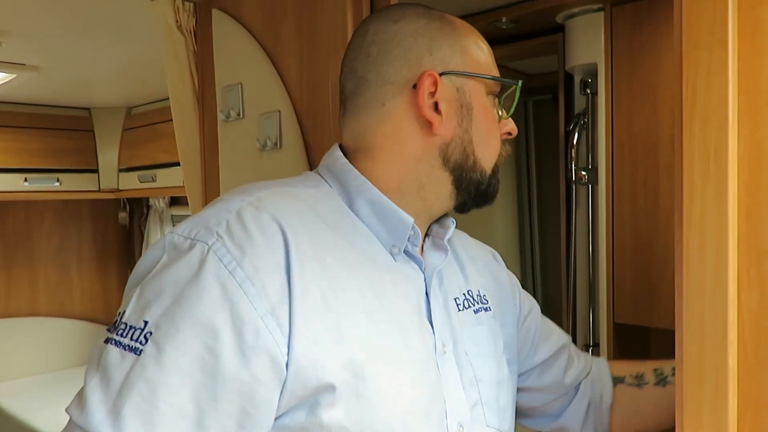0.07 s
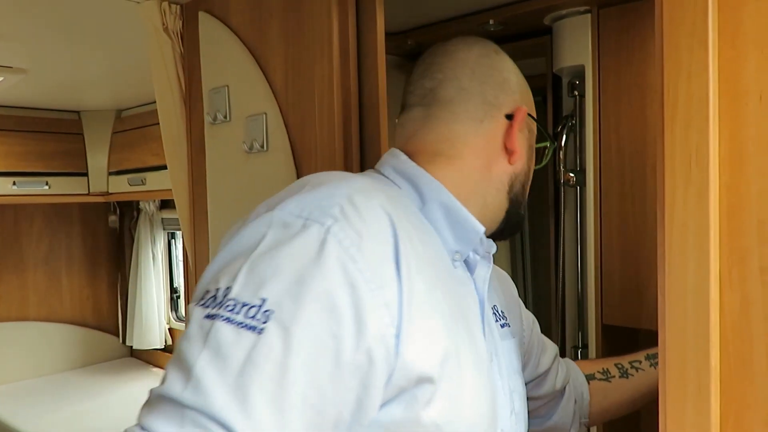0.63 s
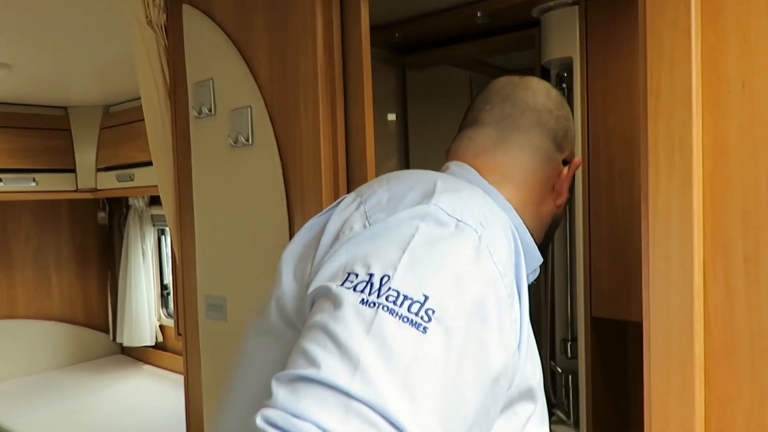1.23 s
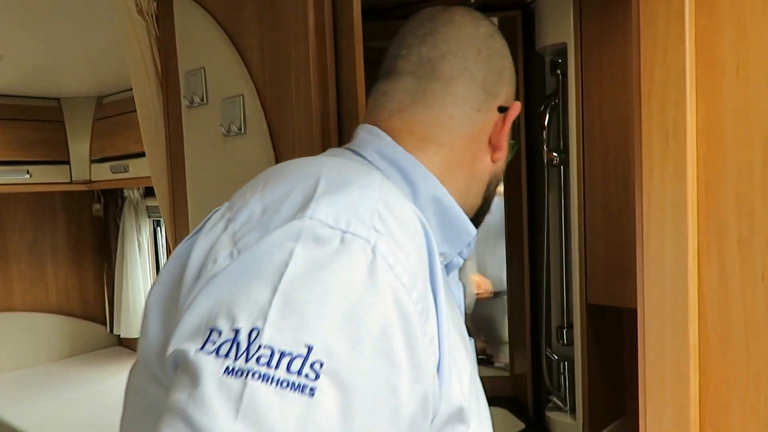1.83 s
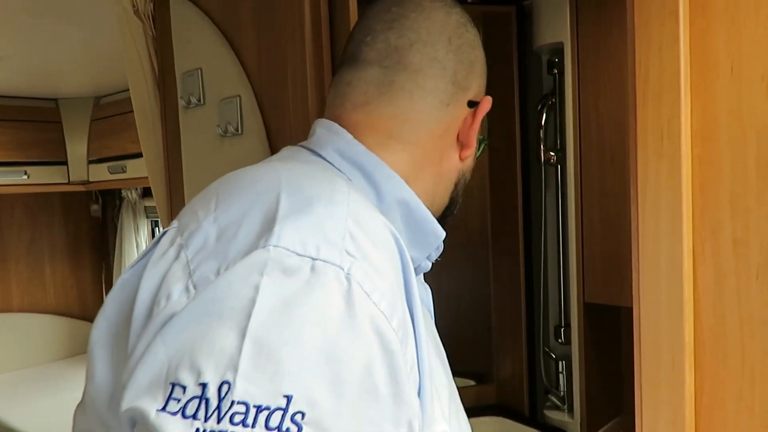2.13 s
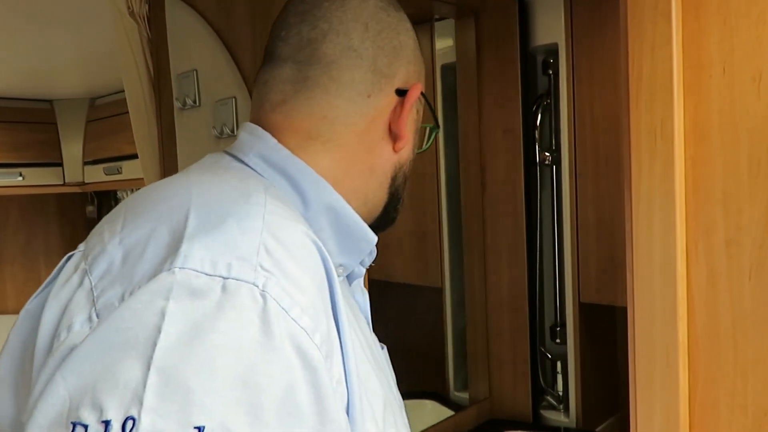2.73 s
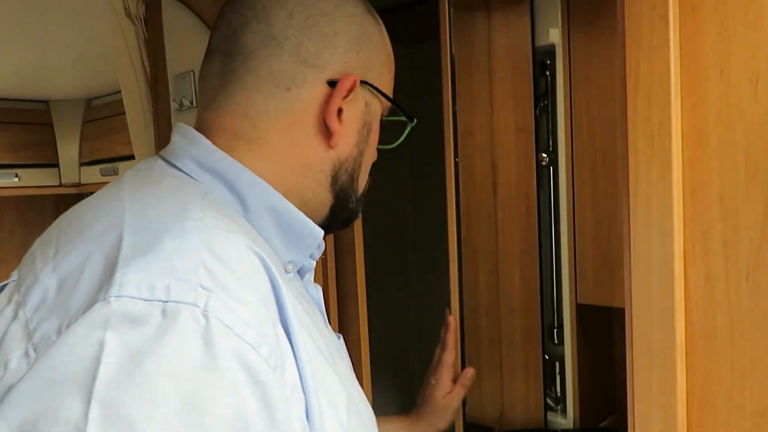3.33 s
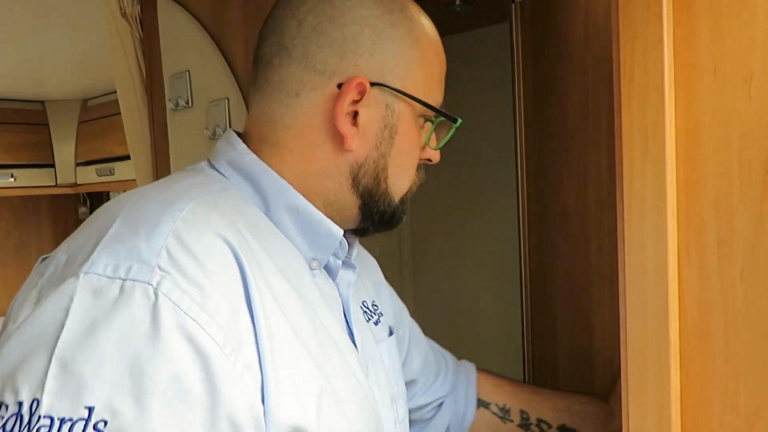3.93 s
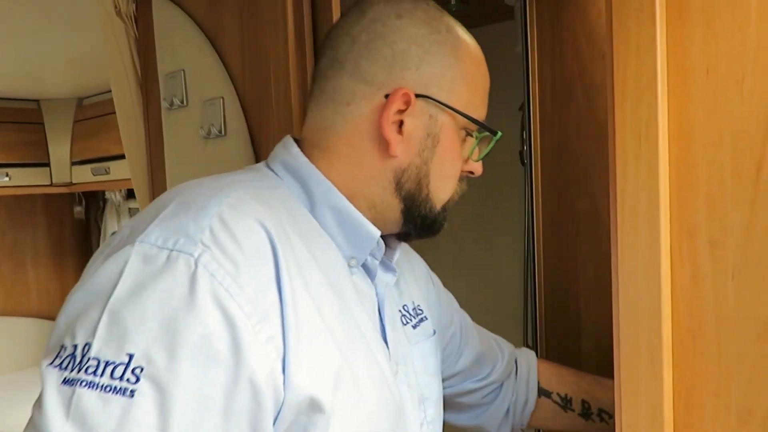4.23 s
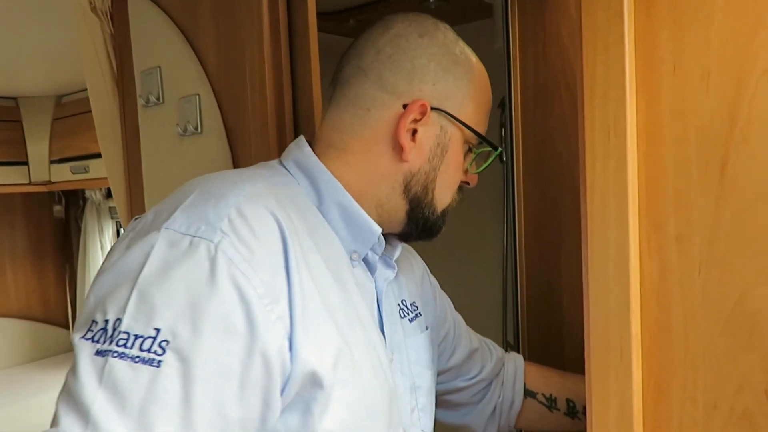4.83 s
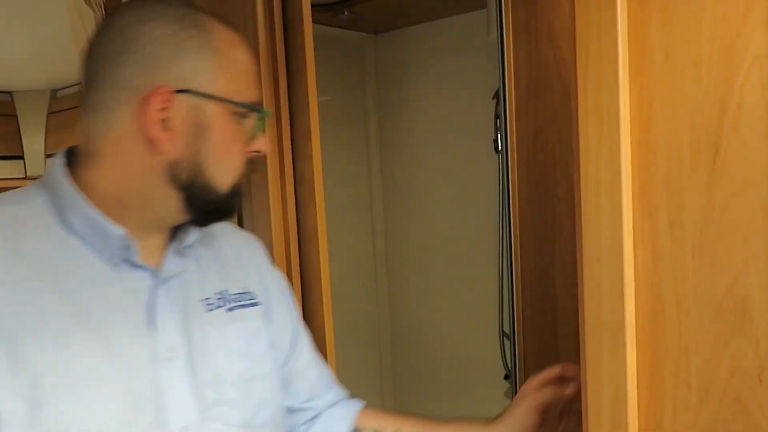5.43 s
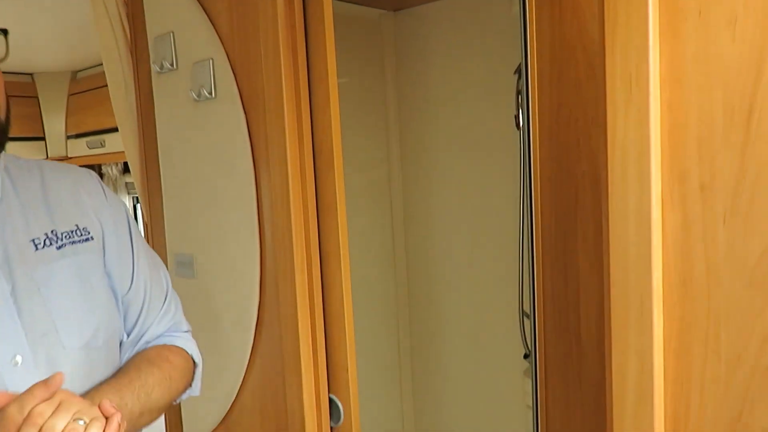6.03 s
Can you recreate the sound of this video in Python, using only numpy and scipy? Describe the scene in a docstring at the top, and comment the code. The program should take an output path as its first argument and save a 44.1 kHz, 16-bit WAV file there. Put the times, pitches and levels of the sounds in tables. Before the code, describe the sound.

Sleeves brush softly on woodwork with a tiny squeak, then a loud, sharp wooden knock lands at about 0.65 seconds. Small clicks lead to a metal catch snapping with a short ring at 1.6. A wooden sliding panel rumbles along its track, sticking and slipping. From 2.2 to 2.8 it binds, with a low buzzing judder, grinding and chattering metal fittings, and it keeps shuddering until 3.3. From 3.5 it rolls freely, its runners whirring slightly higher and louder. At 4.2 it knocks and rubs into its end stop, thudding home at 4.4. Lighter knocks, clicks, cloth rustles and brief hand squeaks follow from 5 seconds, with a last clack near 6.1. Everything is close to the microphones and dry, in a small motorhome cabin with faint air and a low hum behind.

```python
"""A wooden sliding panel, worked by hand, close to a pair of microphones in a small, dry motorhome cabin.
A door knocks and a catch snaps, ringing wood and metal. The panel sticks and slips along its track,
binds with its fittings chattering, runs free on whirring runners, rubs into its end stop and thuds home.
Hands and sleeves brush and squeak on the woodwork; behind it all lie the cabin's air and a low hum."""
import sys
import numpy as np
from scipy import signal
from scipy.fft import rfft, irfft
from scipy.io import wavfile

SR = 44100
rng = np.random.default_rng(int(sys.argv[2]) if len(sys.argv) > 2 else 0)


def int16_out(signal):
    """Quantize to a 16-bit WAV file."""
    q = np.round(np.clip(np.atleast_2d(signal).T, -1, 1) * 32767)
    wavfile.write(sys.argv[1], SR, q.astype(np.int16))


N = 272979
TIME = np.arange(N) / SR
RING_TIME = TIME[:2 ** 15]


def amp(db):
    """Decibels to gain."""
    return 10 ** (np.asarray(db) / 20)

def unit_rms(x):
    """Scales to rms 1."""
    return x / np.sqrt(np.mean(x ** 2) + 1e-20)

def curve_at(points, hz):
    """Reads a curve on a log-frequency axis."""
    f, value = np.transpose(points)
    return np.interp(np.log(hz + 1), np.log(f + 1), value)

def wander(hz):
    """Random drift of rms 1, mostly slower than hz."""
    return unit_rms(irfft(rfft(rng.standard_normal(N)) / (1 + (np.fft.rfftfreq(N, 1 / SR) / hz) ** 4), N))

def phase(hz):
    """Running phase of a steady or moving pitch."""
    return 2 * np.pi * np.cumsum(hz * np.ones(N)) / SR

def fuzzy_tone(hz, width_hz):
    """A narrow band of noise that follows a pitch."""
    turn = phase(hz)
    return wander(width_hz) * np.cos(turn) + wander(width_hz) * np.sin(turn)

def ramp(start, end, slope):
    """A steady change from start to end, zero at the middle."""
    return slope * (np.clip(TIME, start, end) - (start + end) / 2)

def stroke(start, end, attack, release, growth=0):
    """Gain of one movement: eases in, changes by growth dB a second, eases out."""
    gate = (1 + np.tanh((TIME - start) / (2 * attack))) * (1 + np.tanh((end - TIME) / (2 * release))) / 4
    return gate * amp(ramp(start, end, growth))

# Likeness of a near source at the two microphones: f/Hz, correlation
NEAR_LIKENESS = [(100, 1), (180, .9998), (350, .986), (700, .986), (1400, .96), (2800, .86), (5600, .7),
                 (10000, .35), (14000, .2)]
def mic_noise(size, colour, likeness=NEAR_LIKENESS, spread=1, lag_s=1.1e-5):
    """Coloured noise at two close microphones: alike in the bass, apart in the treble, the left late."""
    hz = np.fft.rfftfreq(size, 1 / SR)
    left, other = rfft(rng.standard_normal((2, size)))
    same = np.clip(1 - spread * (1 - curve_at(likeness, hz)), -.4, 1)
    right = (same * left + np.sqrt(1 - same ** 2) * other) * np.exp(2j * np.pi * hz * lag_s)
    return unit_rms(irfft(np.array([left, right]) * amp(curve_at(colour, hz)), size))

# Peaks and dips of the woodwork: f/Hz, width/Hz, gain/dB
WOOD_RESONANCES = [(446, 7.5, 2.5), (637.6, 26, 4), (814, 29, 2), (925, 35, 4.5), (1213, 110, 3.5),
                   (1433, 37, 4.5), (1960, 100, 6), (1980, 150, -4), (2560, 69, 1.5), (3340, 19, -14),
                   (5150, 95, 2)]
def woodwork(x, echo=0.25, count=7):
    """Colours a sound with the wood's resonances and reflections off close surfaces; rms 1."""
    rung = x + sum((amp(db) - 1) * signal.lfilter(*signal.iirpeak(hz, hz / width, SR), x)
                   for hz, width, db in WOOD_RESONANCES)
    taps = np.zeros(400)
    taps[rng.integers(20, len(taps), count)] = echo * rng.choice([-1, 1], count)
    taps = signal.lfilter(*signal.butter(1, 600, "high", fs=SR), taps)  # small surfaces return little bass
    taps[0] = 1
    return unit_rms(signal.oaconvolve(rung, taps[None], axes=1)[:, :x.shape[1]])

def metal(x, ring_db, ring_hz=9800, width_hz=800):
    """Adds the thin ring of the metal fittings to whatever shakes them."""
    return x + amp(ring_db) * signal.lfilter(*signal.iirpeak(ring_hz, ring_hz / width_hz, SR), x)


# Room tone of the cabin: f/Hz, level/dB
AIR_COLOUR = [(15, -44), (25, 1), (70, -2), (116, -6), (232, -9), (500, -15.5), (900, -17.5), (1900, -24.5),
              (4700, -31.5), (10500, -44), (14000, -42), (15500, -76)]
# Likeness of diffuse sound at the two microphones: f/Hz, correlation
DIFFUSE_LIKENESS = [(80, .99), (180, .88), (350, .45), (700, .45), (1400, .15), (2800, -.05), (6000, -.2),
                    (12000, -.3)]
def cabin_air():
    """A low, wavering hum and diffuse air all round the microphones."""
    hum = amp(-57) * fuzzy_tone(hz=70, width_hz=0.73)
    return hum + amp(-51) * mic_noise(N, AIR_COLOUR, DIFFUSE_LIKENESS)

# Cloth on wood: f/Hz, level/dB
CLOTH_COLOUR = [(100, -19), (250, -1.5), (600, -3), (1200, -11), (2500, -14.5), (5000, -17), (9000, -22.5),
                (15000, -28)]
# Strokes of sleeves and hands: start/s, end/s, level/dB
SLEEVE_STROKES = [(0.178, 0.312, -52.5), (0.583, 0.653, -56), (0.926, 0.97, -54.5), (1.06, 1.123, -59),
                  (4.88, 5.035, -58.5), (5.353, 5.425, -45.5), (5.464, 5.617, -45.5), (5.644, 5.747, -50),
                  (5.975, 6.19, -49)]
def sleeves(grain_db=3, rustle_db=-62):
    """Cloth brushes in uneven grains, wide across the pair, and keeps rustling between strokes."""
    strokes = sum(amp(db) * stroke(start, end, 0.022, 0.013) for start, end, db in SLEEVE_STROKES)
    grains = mic_noise(N, CLOTH_COLOUR, spread=8.1) * amp(grain_db * wander(42))
    return woodwork(grains) * np.hypot(strokes, amp(rustle_db))

# Squeaks: start/s, end/s, mid level/dB, growth/(dB/s), mid f/Hz, glide/(Hz/s)
SQUEAK_STROKES = [(0.199, 0.22, -45.5, 0, 509, -3), (0.919, .99, -48.5, -92, 945, -1700),
                  (5.394, 5.413, -44, 0, 1327, -2000), (5.662, 5.721, -53.5, -40, 871, 799.5)]
# Their harmonics: multiple, level/dB
SQUEAK_HARMONICS = [(1, 1), (2, -8), (3, -11)]
def squeaks(jitter=.06, flutter_db=2, edge_s=.005):
    """Skin and wood stick and slip briefly on wood, at an unsteady pitch."""
    out = np.zeros(N)
    unsteady = 1 + jitter * wander(260)
    for start, end, db, growth, hz, glide in SQUEAK_STROKES:
        turn = phase((hz + ramp(start, end, glide)) * unsteady)
        voice = sum(amp(part_db) * np.cos(k * turn) for k, part_db in SQUEAK_HARMONICS)
        out += amp(db) * stroke(start, end, edge_s, edge_s, growth) * unit_rms(voice)
    return out * amp(flutter_db * wander(160))

def struck(x, db):
    """Sets the level of the first 18 ms of a blow."""
    return amp(db) * x / np.sqrt(np.mean(x[..., :800] ** 2) + 1e-20)

def modes(table, t60_factor, rise_s):
    """Dying sines that swell as a blow spreads through the struck part."""
    ring = sum((-1) ** k * amp(db - 60 * RING_TIME / (t60 * t60_factor))
               * np.sin(2 * np.pi * hz * RING_TIME) for k, (hz, db, t60) in enumerate(table))
    return ring * (1 - np.exp(-RING_TIME / rise_s))

# Clack, rap, crack and tick of a blow: f/Hz, width/Hz
IMPACT_BANDS = [(560, 310), (1400, 1550), (3700, 2500), (9000, 15800)]
def impact(contact_s, voice, db, tilt, cabin_t60, direct, swell, bass_db, low_db, top_db):
    """A contact burst, then dense reflections off the close walls; each blow tilts it brighter or darker by its
    own amount."""
    hz, width = np.transpose(IMPACT_BANDS)
    band_db = np.array(voice) + db + tilt * np.log2(hz / hz[1])
    density = band_db - 10 * np.log10(width)
    colour = [(200, density[0] + bass_db), (380, density[0] + low_db),
              *zip(hz, density), (15000, density[-1] + top_db)]
    reflections = amp(-60 * RING_TIME / cabin_t60) + amp(-36 - 60 * RING_TIME / 0.25)
    decay = direct * np.exp(-RING_TIME / contact_s) + reflections
    onset = 1 - np.exp(-RING_TIME / (swell * contact_s))
    burst = woodwork(mic_noise(len(RING_TIME), colour) * decay * onset, echo=0.16)
    return struck(burst, 10 * np.log10(np.sum(amp(band_db) ** 2)))

# Snaps: t/s, ring level/dB, contact/s, impact level/dB, tilt/(dB/octave)
SNAPS = [(.194, -68, 0.013, -57.5, -2), (.549, -72, .013, -57, -4), (.886, -67, 0.0021, -54, -9),
         (0.967, -81, .011, -54, -2), (1.364, -60, .003, -48, -1), (1.387, -45, 0.0032, -45, -0.8),
         (1.448, -50, .003, -49.5, -0.6), (1.577, -57, 0.0011, -56.5, -15), (1.632, -23, 0.0018, -29, -1.3),
         (1.748, -65, 0.017, -47.5, -5.5), (3.436, -61, 0.0054, -55, -0.5), (4.154, -55, 0.0085, -40.5, 2),
         (4.438, -45, 0.0099, -53.5, 3.5), (4.463, -71, 0.0048, -51, 2), (4.575, -55, 0.002, -61, 2.5),
         (4.671, -72, 0.0066, -59, -5), (4.992, -75, .0037, -73, 2.5), (5.392, -72, 0.0026, -44.5, -4),
         (5.514, -59, 0.003, -58.5, 1.3), (6.054, -65, 0.013, -41.5, -0.5), (6.078, -51, 0.0067, -51, 1)]
# Modes of the catch: f/Hz, level/dB, unscaled t60/s
CATCH_MODES = [(611, 9, 0.11), (700, 5, 0.063), (847, -16, 0.18), (1115, -2, 0.13), (1527, -26, 0.16),
               (1565, -13, 0.3), (2480, -2.5, 0.074), (3100, -38, 0.083), (3520, -16, 0.126),
               (3910, 10, 0.027), (5730, -21, 0.1)]
# Clack, rap, crack and tick of a snap before tilt: level/dB
SNAP_BANDS = [-6.5, 1, 3.5, -1]
def catch_snaps():
    """The catch and fittings snap against the wood, close by."""
    out = np.zeros((2, N))
    for s, ring_db, contact_s, db, tilt in SNAPS:
        snap = impact(contact_s, SNAP_BANDS, db, tilt, cabin_t60=0.17, direct=0.36, swell=0.34,
                      bass_db=-32, low_db=-2, top_db=-0.5)
        ring = struck(modes(CATCH_MODES, t60_factor=0.72, rise_s=0.018), ring_db)
        add(out, s, ring + metal(snap, ring_db=1.7 * tilt - 5))  # the brightest are metal on metal
    return out

def add(mix, s, sound):
    """Mixes a stereo sound in at s seconds."""
    part = mix[:, round(s * SR):][:, :sound.shape[1]]
    part += sound[:, :part.shape[1]]

# Blows: t/s, wall level/dB, panel level/dB, panel t60 factor, contact/s, impact level/dB, tilt/(dB/octave)
BLOWS = [(0.367, -62, -67, .8, 0.0013, -59, -5.5), (0.416, -42.5, -47, 0.99, 0.0031, -74, -8),
         (.640, -37, -57, .9, 0.0041, -45, -1), (.646, -21.5, -10.5, 0.58, 0.0021, -24.5, 0.15),
         (.656, -27, -31, 1, 0.0031, -24.5, -3), (.697, -31.5, -25, 0.75, 0.0046, -35.5, -3.5),
         (1.222, -39, -44, 1.5, 0.009, -73.5, -15), (1.336, -36, -59, 1.1, 0.011, -53, -7.5),
         (1.353, -53, -30.5, 0.91, .0059, -53.5, 0), (3.372, -33, -49, 0.91, .009, -75, -2),
         (3.575, -58, -37.5, .8, .008, -56.5, -9), (3.675, -40.5, -39, .8, .008, -52, -2.5),
         (4.24, -30, -23.5, .6, 0.0044, -41.5, -4.5), (4.3959, -19, -13, 0.44, 0.0033, -34.5, -5),
         (5.03, -40.5, -53, 0.84, .009, -65, -6), (5.213, -60, -47, 0.72, .012, -59, -7.5),
         (5.324, -35.5, -37, 0.37, 0.008, -55.5, -0.5), (5.470, -40, -41.5, 2, 0.0014, -45.5, -5),
         (5.575, -43, -46, 0.43, .007, -71, -10), (5.795, -43.5, -48, 1.1, .0064, -82, 2),
         (6.050, -31, -34, 0.37, 0.012, -48, 2.5), (6.107, -40, -35.5, 0.31, 0.0071, -46.5, -5.5)]
# Modes of the wall and of the panel: f/Hz, level/dB, unscaled t60/s
WALL_MODES = [(36.7, -6.5, 1), (56.5, 14.5, 0.11), (76.4, 1, 0.35), (105.4, 3.5, 0.34)]
PANEL_MODES = [(124.5, -9, 0.55), (162.2, 2.5, 0.2), (191.6, 4, 0.21), (264.6, -10, 0.36),
               (307.8, -4.5, 0.28), (371, -8, 0.18), (442, -46, 0.23), (555, -9, 0.18), (640, -23.5, 0.42)]
# Clack, rap, crack and tick of a knock before tilt: level/dB
KNOCK_BANDS = [-0.67, -0.88, 1, -3.2]
def knocks():
    """Each blow rings the panel and booms in the wall that holds it."""
    out = np.zeros((2, N))
    for s, boom_db, ring_db, t60_factor, contact_s, db, tilt in BLOWS:
        boom = struck(modes(WALL_MODES, 1, rise_s=0.0014), boom_db)
        ring = struck(modes(PANEL_MODES, t60_factor, rise_s=0.0038), ring_db)
        rap = impact(contact_s, KNOCK_BANDS, db, tilt, cabin_t60=0.19, direct=0.77, swell=0.41,
                     bass_db=-18, low_db=2, top_db=-8)
        add(out, s, boom + ring + rap)
    return out

def runner_whirr(start=3.5, end=4.5, edge_s=.018):
    """The runners whirr higher and louder as the panel gathers speed."""
    hz = 425.5 + ramp(start, end, 56)
    whirr = .55 * fuzzy_tone(hz, width_hz=6.9) + .6 * fuzzy_tone(hz, width_hz=61)
    return amp(-39.5) * stroke(start, end, edge_s, edge_s, growth=9) * whirr

def binding(growth=0, lag_s=0, attack=.02):
    """Gain of the stretch midway where the panel binds in its track."""
    return stroke(2.24 + lag_s, 2.82 + lag_s, attack, .022, growth)

# Pushes of the hand: start/s, end/s, mid level/dB, growth/(dB/s)
HAND_PUSHES = [(1.355, 1.652, -37, 8), (1.723, 3.197, -41, 1), (3.373, 4.192, -39, -2.5)]
# Rumble of the runners: f/Hz, level/dB
RUNNER_COLOUR = [(30, -9.5), (65, 9), (110, 0.5), (170, 6.5), (270, -4.5), (400, -6), (600, -11.5),
                 (900, -16), (1500, -22), (3000, -24), (4700, -30), (7000, -36.5), (10000, -37),
                 (15000, -41.5)]
def runner_rumble(bumps_db=.9):
    """Pushed along, the runners roll over small bumps in the track."""
    push = sum(amp(db) * stroke(start, end, 0.05, 0.079, growth) for start, end, db, growth in HAND_PUSHES)
    rolling = mic_noise(N, RUNNER_COLOUR, spread=2.15) * amp(bumps_db * wander(27))
    return woodwork(rolling) * (push + amp(-43) * binding())

# Rubs at the end stop: start/s, end/s, mid level/dB, growth/(dB/s)
STOP_RUBS = [(4.173, 4.245, -34, 60), (4.231, 4.383, -30, 2), (4.417, 4.54, -41.5, -90)]
# Their rasp: f/Hz, level/dB
RASP_COLOUR = [(70, -26), (130, -3.5), (200, -3), (330, -8.5), (450, -17), (600, -13.5), (850, -23.5),
               (1500, -22), (2300, -32), (4000, -39.5), (9000, -57), (14000, -65)]
# Shudders where the panel catches: start/s, end/s, level/dB
STOP_SHUDDERS = [(4.174, 4.228, -25.5), (4.274, 4.336, -20.5), (4.447, 4.626, -43)]
def end_stop(rasp_db=0.5, shudder_hz=62, attack=0.0056, release=0.0096):
    """The panel rubs and shudders as it meets its stop."""
    rub = sum(amp(db) * stroke(start, end, attack, release, growth) for start, end, db, growth in STOP_RUBS)
    shake = sum(amp(db) * stroke(start, end, attack, release) for start, end, db in STOP_SHUDDERS)
    rasp = woodwork(mic_noise(N, RASP_COLOUR) * amp(rasp_db * wander(70)))
    shudder = np.sqrt(2) * np.sin(phase(shudder_hz * (1 + 0.146 * wander(26.3))))
    return rasp * rub + shudder * shake

# Rattle of the fittings: f/Hz, level/dB
FITTINGS_COLOUR = [(200, -35), (450, -11), (900, -10.5), (1600, -18), (3000, -15.5), (4600, -16.5),
                   (6900, -23), (8500, -21), (9700, -17.5), (10800, -23), (13700, -22.5), (15500, -35)]
def fittings_chatter(shaking, lag_s):
    """The binding panel shakes its metal fittings, which follow a little late."""
    rattle = woodwork(mic_noise(N, FITTINGS_COLOUR) * shaking, echo=0.14)
    ringing = unit_rms(metal(rattle, ring_db=-0.5, width_hz=420))
    return amp(-34.5) * ringing * binding(lag_s=lag_s, attack=0.028) ** 1.23

# The panel's edge grinding in the track: f/Hz, level/dB
EDGE_COLOUR = [(100, -23), (220, 13.5), (290, 14.5), (400, 14.5), (650, -11), (900, -2.5), (1600, -41),
               (5000, -30)]
def edge_grind(shaking, lag_s, break_s=2.765):
    """The edge presses ever harder, with a last hard grind as it breaks free."""
    pressure = amp(-40.5) * binding(growth=26, lag_s=lag_s)
    breaking = amp(-39) * np.exp(-((TIME - break_s) / .035) ** 2)
    return woodwork(mic_noise(N, EDGE_COLOUR) * shaking) * (pressure + breaking)

# Stick-slip of the panel: t/s, slip rate/Hz, sway level/dB
STICK_SLIP = [(1.8, 49.2, -50), (1.89, 54.4, -42), (2.042, 54.0, -37), (2.128, 50.6, -34),
              (2.26, 50.6, -27), (2.69, 51.2, -22), (2.842, 55.4, -16), (2.978, 55.4, -38),
              (3.052, 59.0, -26), (3.164, 54.5, -23), (3.214, 55.8, -35), (3.28, 61.7, -46)]
# Its buzz: multiple of the slip rate, level/dB
BUZZ_HARMONICS = [(3, 0.5), (4, -6), (5, -14.5), (6, -10), (7, -17), (8, -40), (9, -17.5), (10, -37),
                  (13, -21)]
def panel_judder(jitter=0.01, rough=0.76, flutter_db=1.5, surge_db=1.07, lag_s=0.015):
    """Close to the microphones the panel sticks and slips some fifty times a second, and binds midway."""
    s, slip_hz, sway_db = np.transpose(STICK_SLIP)
    turn = phase(np.interp(TIME, s, slip_hz) * (1 + jitter * wander(22.3)))
    sway = amp(np.interp(TIME, s, sway_db)) * stroke(s[0], s[-1], .03, .03)
    # drumming (at twice the slip rate) and buzz follow the sway, and swell in the bind
    drum_gain = np.hypot(amp(-8.5) * sway, amp(-15) * binding(growth=5))
    buzz_gain = np.hypot(amp(-21.5) * sway, amp(-29) * binding(growth=12))
    drone = sway * np.cos(turn) + drum_gain * np.cos(2 * turn)
    buzz = buzz_gain * sum(amp(db) * (np.cos(k * turn) + rough * wander(9.1) * np.sin(k * turn))
                           for k, db in BUZZ_HARMONICS)
    pulsing = 1 + 0.06 * np.cos(2 * turn)
    shaking = unit_rms(pulsing * amp(flutter_db * wander(160) + surge_db * wander(9.9)))
    return np.sqrt(2) * (drone + buzz) + fittings_chatter(shaking, lag_s) + edge_grind(shaking, lag_s)

def scene():
    """The panel and hands up close, the cabin's air behind."""
    panel = knocks() + catch_snaps() + panel_judder() + runner_rumble() + end_stop() + runner_whirr()
    return panel + squeaks() + sleeves() + cabin_air()

def record(dry):
    """The recorder cuts both microphones off above 15.6 kHz."""
    return signal.oaconvolve(dry, signal.firwin(301, 15600, window=("kaiser", 9), fs=SR)[None], "same")


dry = scene()
out = record(dry)
int16_out(out)
```